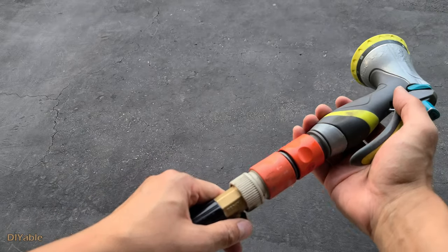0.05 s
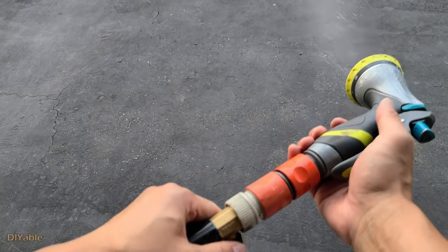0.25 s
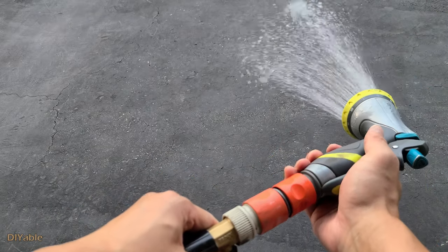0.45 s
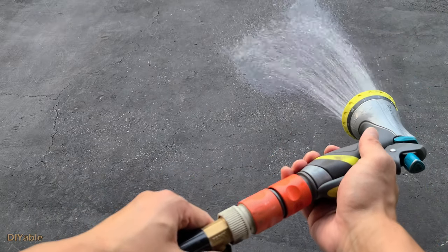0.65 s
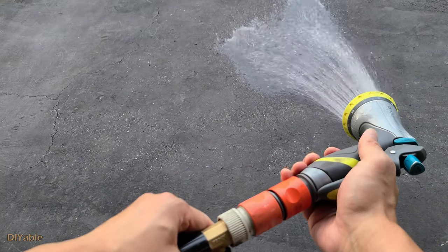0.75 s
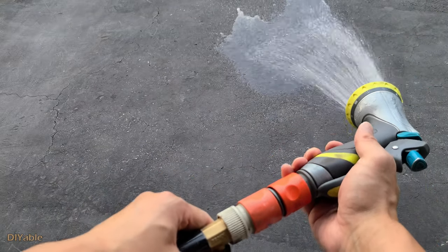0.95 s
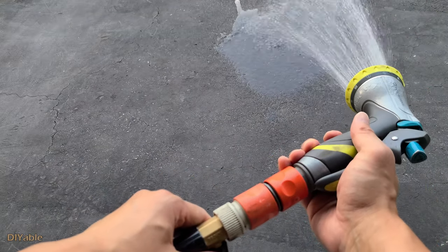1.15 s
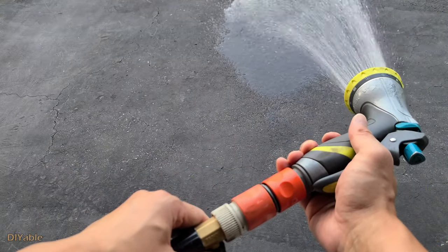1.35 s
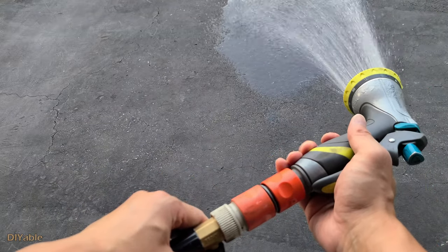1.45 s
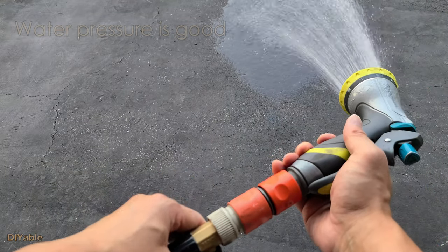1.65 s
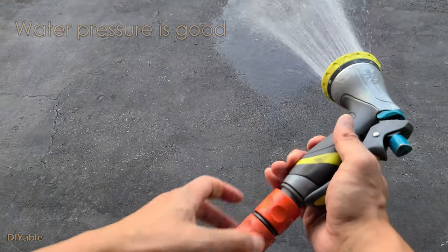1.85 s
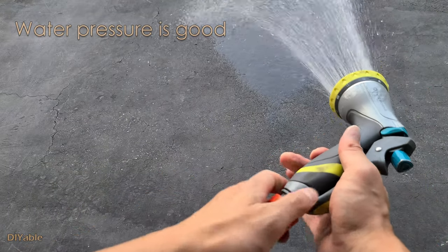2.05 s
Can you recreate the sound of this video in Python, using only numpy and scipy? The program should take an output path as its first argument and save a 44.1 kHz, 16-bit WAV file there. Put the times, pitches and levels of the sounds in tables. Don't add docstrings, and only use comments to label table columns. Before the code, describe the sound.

Close stereo pickup of a garden hose spray starting outdoors: a hard airy spit, then water jets settling into a bright, steady, fizzy hiss on paving, with occasional droplet ticks and a soft low rumble beneath.

```python
import sys
import numpy as np
from scipy import signal
from scipy.fft import rfft, irfft
from scipy.io import wavfile
from scipy.ndimage import uniform_filter1d

SR = 44100
rng = np.random.default_rng(int(sys.argv[2]) if len(sys.argv) > 2 else 0)


def wav_record(signal):
    frames = np.transpose(np.atleast_2d(signal))
    bounded = np.clip(frames, -1, 1)
    quanta = np.round(bounded * 32767).astype(np.int16)
    wavfile.write(sys.argv[1], SR, quanta)


def makeup_ratio(level_db):
    decades = np.asarray(level_db, float) / 20
    return 10 ** decades


N = 92610

# start_s, level_db
AIR_FLOW = [(.195, -67), (.202, -49.5), (.212, -43.5), (.229, -14), (.255, -15.5), (.28, -26), (.3, -26),
            (.33, -34.5), (.46, -39.5), (.64, -50.5), (1.05, -66)]
# start_s, level_db
WATER_FLOW = [(.2, -89), (.24, -38), (.37, -32), (.385, -27.5), (.44, -28.5), (.55, -34.5), (.65, -35.5),
              (1., -35.5), (1.4, -35.5), (1.8, -35.5), (2.1, -36)]
# freq_hz, likeness_0_to_1
PORT_LIKENESS = [(60, 0.99), (270, 0.91), (700, 0.37), (2000, 0.71), (5000, 0.64), (9000, 0.12),
                 (15000, 0.11)]
LAG_S = .00009


def evened(x):
    return x / np.sqrt(np.mean(x ** 2) + 1e-20)


def read(points, hz):
    f, value = np.transpose(points)
    return np.interp(np.log(hz + 1), np.log(f + 1), value)


def level(points):
    return makeup_ratio(np.interp(np.arange(N) / SR, *np.transpose(points), left=-150))


def coloured(x, points):
    return irfft(rfft(x) * makeup_ratio(read(points, np.fft.rfftfreq(N, 1 / SR))), N)


def wash(colour, size, lag_s, patchy_db, flicker_db):
    frames = 4 * N // size + 5
    hz = np.fft.rfftfreq(size, 1 / SR)
    a, b, c, d, patches = rng.standard_normal((frames, len(hz), 5)).T
    patches = uniform_filter1d(patches, size=8, axis=0)
    patches = evened(uniform_filter1d(patches, size=10, axis=1))
    flicker = evened(uniform_filter1d(rng.standard_normal(frames), size=3))
    same = np.clip(read(PORT_LIKENESS, hz), 0, 1)[:, None]
    late = np.exp(-2j * np.pi * hz * lag_s)[:, None]
    right = a + 1j * b
    left = same * late * right + np.sqrt(1 - same ** 2) * (c + 1j * d)
    gain_db = patchy_db * patches + flicker_db * flicker
    spectra = np.array([left, right]) * makeup_ratio(read(colour, hz)[:, None] + gain_db)
    return evened(signal.istft(spectra, nperseg=size, noverlap=size * 3 // 4)[1][:, :N])


def blip(hz, cycles, glide):
    turns = np.arange(600) * hz / SR
    attack = np.minimum(turns / (.15 * cycles), 1)
    shape = attack * np.exp(-2 * turns / cycles) * (turns < 5 * cycles)
    return np.sin(2 * np.pi * turns * (1 + glide * turns / cycles)) * shape


def grains(colour, per_s, spread_db, cycles, low_hz, high_hz):
    out = np.zeros((2, N))
    for hz in np.geomspace(low_hz, high_hz, num=24):
        hit = rng.random(N) < per_s / 24 / SR
        size = np.minimum(rng.exponential(1, N), 3.5)
        side = rng.uniform(-1, 1, N)
        train = makeup_ratio(spread_db * size) * hit
        left = np.roll(train * (1 + side), round(LAG_S * SR))
        pair = np.array([left, train * (1 - side)])
        out += signal.oaconvolve(pair, blip(hz, cycles, 0.096)[None] * hz, axes=1)[:, :N]
    return evened(coloured(out, colour))


def mixed(share, hiss, droplets):
    share = np.clip(share, 0, 1)
    return np.sqrt(1 - share) * hiss + np.sqrt(share) * droplets


def ringing(hz, width_hz, pan_db):
    r = np.exp(-np.pi * width_hz / SR)
    z = rng.standard_normal((2, N)) + 1j * rng.standard_normal((2, N))
    for _ in range(2):
        z = signal.lfilter([1 - r], [1, -r], z)
    same = np.clip(read(PORT_LIKENESS, np.mean(hz)), 0, 1) * np.exp(-2j * np.pi * hz * LAG_S)
    z = np.array([same * z[1] + np.sqrt(1 - abs(same) ** 2) * z[0], z[1]])
    carrier = np.exp(2j * np.pi * np.cumsum(hz * np.ones(N)) / SR)
    return evened((z * carrier).real) * makeup_ratio(np.array([[pan_db], [-pan_db]]) / 2)


def rumble():
    # freq_hz, level_db_per_hz
    rumble_colour = [(20, -17), (45, -7.5), (76, 1.5), (105, -9), (210, -13.5), (420, -23.5), (650, -32.5),
                     (1300, -40), (2000, -100)]
    # start_s, level_db
    traffic = [(0.0, -36.5), (0.67, -41), (0.7, -36.5), (0.76, -45), (0.79, -38.5), (1.14, -39.5),
               (1.28, -38), (1.37, -45), (1.4, -36), (1.44, -39), (1.91, -41.5), (2.1, -38.5)]
    return level(traffic) * wash(rumble_colour, size=4096, lag_s=0, patchy_db=1.5, flicker_db=1.1)


def yard():
    # freq_hz, level_db_per_hz
    yard_colour = [(600, -4), (950, 7.5), (1500, 3), (3000, -6), (4800, -18), (6500, -11.5), (11000, -23),
                   (15700, -27)]
    return makeup_ratio(-63.5) * wash(yard_colour, size=1024, lag_s=0, patchy_db=.8, flicker_db=.2)


def drops():
    # start_s, level_db before panning, pitch_hz, decay_cycles, left_right_db
    big_drops = [(.3772, -23, 2500, 3.5, -4), (.7052, -21, 6200, 9, -2), (.8859, -25, 7000, 8, 2),
                 (1.1005, -23.5, 4900, 6, -4), (1.3336, -15.5, 12300, 9, -6), (1.3336, -20, 9800, 8, -4),
                 (1.3341, -22, 5600, 6, -4), (1.3395, -21, 12000, 24, -4), (1.448, -20, 6800, 9, -1),
                 (1.453, -22, 13500, 9, -4), (1.7206, -26, 4700, 5, -4), (1.8626, -27, 4500, 5, -4),
                 (2.0104, -21, 1660, 7, 1), (2.0106, -20, 4200, 3.5, -4), (2.0107, -24, 10000, 6, -2),
                 (2.0112, -25, 7000, 6, -2), (2.0592, -29, 1900, 4, -2), (2.0613, -25.5, 1680, 7, -2)]
    left_lag_s = 1 / SR
    out = np.zeros((2, N + 700))
    for s, db, hz, cycles, pan_db in big_drops:
        tick = blip(hz, cycles, 0.021) * (1 + 0.13 * rng.standard_normal(600))
        for side, late_s in ((0, left_lag_s), (1, 0)):
            at = round((s + late_s) * SR)
            out[side, at:at + 600] += makeup_ratio(db + (-1.5 - side) * pan_db) * tick
    return out[:, :N]


def nozzle_head():
    # start_s, pitch_hz, level_db
    throat = [(.2, 2050, -70), (0.233, 2030, -17), (.32, 2066, -87), (.6, 2250, -57), (.9, 2150, -50),
              (1.15, 2150, -46), (1.35, 2030, -43.5), (1.6, 2050, -44.5), (1.901, 2250, -48),
              (2.1, 1973, -46)]
    # pitch_hz, width_hz, under_air_db, under_jets_db, left_right_db
    cavities = [(169.4, 103, -17.5, -31.5, 0.5), (545.7, 250, -16, -37.5, 5), (1199, 203, -12.5, -26.5, 8),
                (1423, 145, -6.5, -26.5, 2.5), (2370, 44, -9.5, -15.5, 0.5), (2712, 31, -22, -61, 9),
                (3282, 570, -18.5, -15, -0.5), (4310, 300, -12, -42, -3), (5940, 50, -3, -26, 11)]
    s, hz, db = np.transpose(throat)
    pitch_hz = np.interp(np.arange(N) / SR, s, hz)
    out = level(np.transpose([s, db])) * ringing(pitch_hz, width_hz=295, pan_db=-6)
    air, water = level(AIR_FLOW), level(WATER_FLOW)
    blown = air * (air / air.max()) ** .4
    for hz, width_hz, air_db, jet_db, pan_db in cavities:
        drive = blown * makeup_ratio(air_db) + water * makeup_ratio(jet_db)
        out += drive * ringing(hz, width_hz, pan_db)
    return out


def air_spit():
    # freq_hz, level_db_per_hz
    air_colour = [(88, -38), (150, -14), (821, -9), (1080, -1), (2400, -2.5), (5150, -3.5), (6140, -4.5),
                  (9080, -7), (16000, -10.5)]
    hiss = wash(air_colour, size=256, lag_s=LAG_S, patchy_db=2.5, flicker_db=-2.0)
    spit = grains(air_colour, per_s=6000, spread_db=2.8, cycles=6.65, low_hz=451.4, high_hz=15300)
    return level(AIR_FLOW) * mixed(.4, hiss, spit)


def jets():
    # freq_hz, level_db_per_hz
    jet_colour = [(400, -20), (1000, -11.5), (1450, -9.5), (1780, -10.5), (1980, -3.5), (3400, -2),
                  (3800, -6.5), (15700, -2.5)]
    hiss = wash(jet_colour, size=512, lag_s=LAG_S, patchy_db=1.66, flicker_db=1.5)
    fizz = grains(jet_colour, per_s=9000, spread_db=2.5, cycles=8.3, low_hz=940, high_hz=15400)
    return level(WATER_FLOW) * mixed(.25, hiss, fizz)


def scene():
    # freq_hz, gain_db
    left_port = [(1000, 3), (2000, 3), (5500, 3.5), (7300, 9.5), (9200, -4.5), (12000, 3), (16000, 4)]
    # freq_hz, gain_db
    right_port = [(1000, 5.5), (2000, 5.5), (5000, 7.7), (6700, 11), (7900, -5), (12500, 9), (16000, 9.5)]
    near = air_spit() + jets() + yard()
    ports = np.array([coloured(near[0], left_port), coloured(near[1], right_port)])
    return ports + nozzle_head() + drops() + rumble()


def low_pass(x):
    return signal.sosfilt(signal.butter(12, 16900, fs=SR, output="sos"), x)


def record(dry):
    edge = signal.firwin(1023, 15740, window=("kaiser", 10), fs=SR)
    limited = np.tanh(dry) / 1.106
    return low_pass(signal.oaconvolve(limited, edge[None], "same", axes=1))


dry = scene()
out = record(dry)
wav_record(out)
```